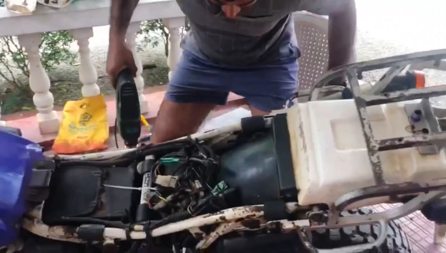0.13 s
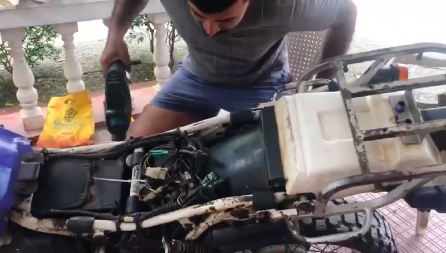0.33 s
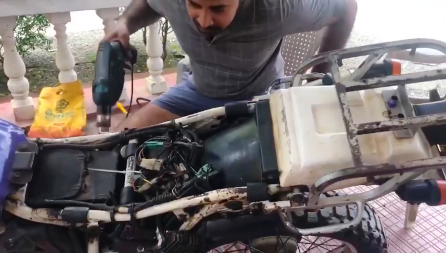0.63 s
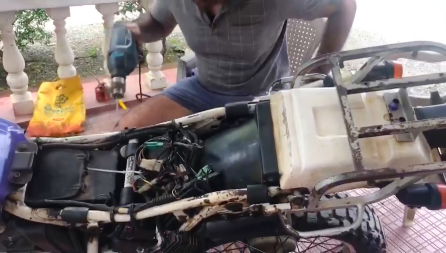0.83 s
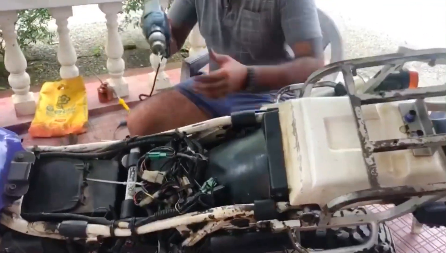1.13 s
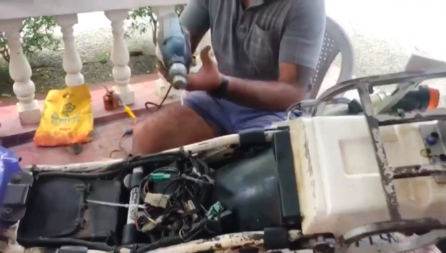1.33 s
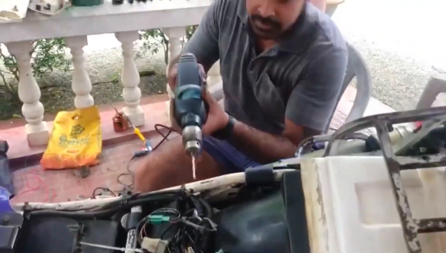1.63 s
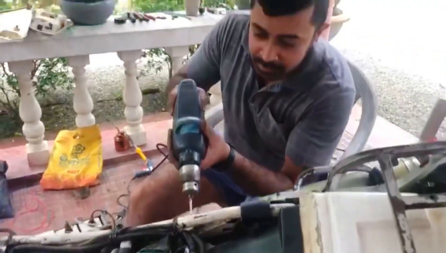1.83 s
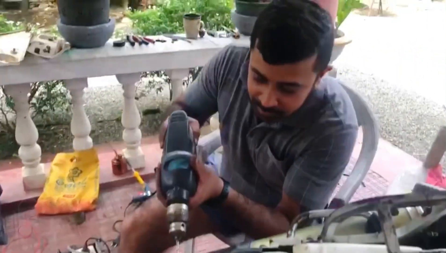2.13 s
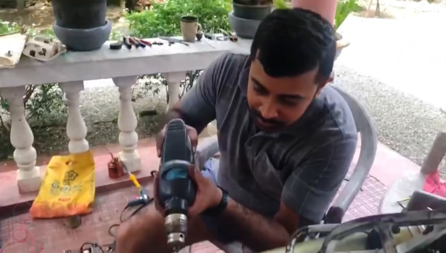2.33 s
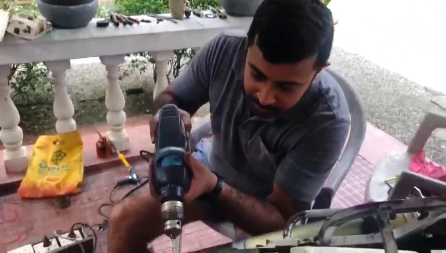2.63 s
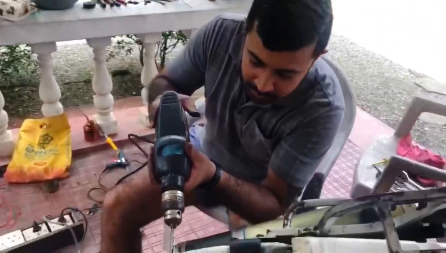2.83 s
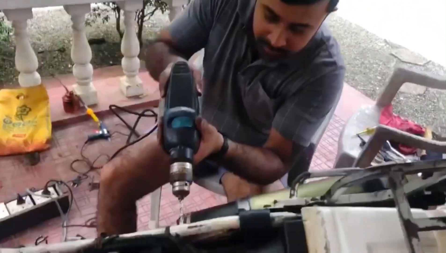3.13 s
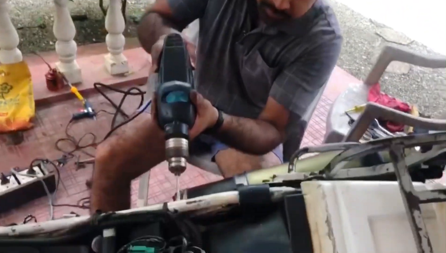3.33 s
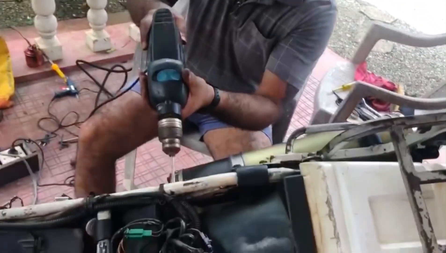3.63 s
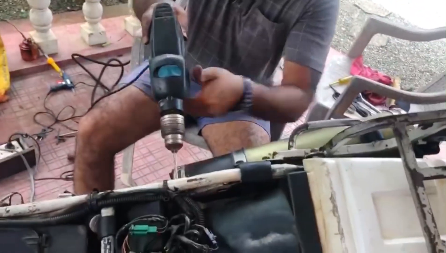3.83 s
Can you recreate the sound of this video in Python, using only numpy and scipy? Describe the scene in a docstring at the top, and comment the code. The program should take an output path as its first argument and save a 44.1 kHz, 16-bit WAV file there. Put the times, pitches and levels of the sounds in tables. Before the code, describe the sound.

An electric drill whirs down to a stop, pauses, then bursts back up to speed on a porch.

```python
"""A corded drill coasts down on a porch while a plastic chair judders over the tiles and the slowing gears
groan briefly. In the lull the tool is handled: small clicks, dull knocks, a rustle of cloth and one clink. Then
a blip of the trigger spins it up and it coasts again; garden rumble and insects lie behind throughout. The
shaft speed drives commutator whine, brush hiss and gear rattle, and in the blip the fan rush. Chair, chuck and
frame are decaying modes; knocks, cloth and garden take coloured noise."""
import sys
import numpy as np
from scipy import signal
from scipy.fft import rfft, irfft, next_fast_len
from scipy.io import wavfile
from scipy.ndimage import map_coordinates

SR = 44100
rng = np.random.default_rng(int(sys.argv[2]) if len(sys.argv) > 2 else 0)


def to_wav(s):
    """Save 16-bit WAV."""
    ch = np.atleast_2d(s).T  # columns
    pcm = np.round(np.clip(ch, -1, 1) * 32767)  # PCM
    wavfile.write(sys.argv[1], SR, pcm.astype(np.int16))


N = 176400
TOP_HZ = 12000


def amp(db):
    """Decibels to gain."""
    return 10 ** (np.asarray(db) / 20)


def unit(x):
    """Scale to rms 1."""
    return x / np.sqrt(np.mean(x ** 2) + 1e-20)


def clock():
    """Time of each sample in seconds."""
    return np.arange(N) / SR


def gains(rows):
    """One gain per sample for each dB column, -120 dB outside the rows."""
    s, *columns = np.transpose(rows)
    return [amp(np.interp(clock(), s, db, left=-120, right=-120)) for db in columns]


def wobble(knots_per_s):
    """A smooth random curve through normally distributed knots."""
    return map_coordinates(rng.standard_normal(N // 20), [clock() * knots_per_s], mode="mirror")


def filtered(x, response):
    """x times a response of frequency."""
    size = next_fast_len(N + SR // 4)
    hz = np.fft.rfftfreq(size, 1 / SR)
    return irfft(rfft(x, size) * response(hz), size)[:N]


def coloured(x, points):
    """x through a (Hz, dB) colour, falling away below the first point, at rms 1."""
    point_hz, point_db = np.transpose(points)

    def response(hz):
        db = np.interp(np.log(hz + 1), np.log(point_hz), point_db)
        return amp(db) * np.minimum(hz / point_hz[0], 1) ** 2

    return unit(filtered(x, response))


def noise(points):
    """Noise of the given colour at rms 1."""
    return coloured(rng.standard_normal(N), points)


def decay(s, t60_s):
    """A sudden start at s and an exponential fall."""
    age_s = clock() - s
    return (age_s >= 0) * amp(-60 * np.maximum(age_s, 0) / t60_s)


def ring(modes, s, scatter_db):
    """Decaying sine modes struck at s, each level scattered at random."""
    t = np.arange(SR) / SR
    tone = np.zeros(SR)
    for hz, db, t60_s in modes:
        level_db = db + scatter_db * rng.normal()
        tone += amp(level_db - 60 * t / t60_s) * np.sin(2 * np.pi * hz * t)
    attack = 1 - np.exp(-t / 0.0015)
    out = np.zeros(N + SR)
    out[max(round(s * SR), 0):][:SR] = tone * attack
    return out[:N]


SPEED_JITTER = .0012  # share of the shaft speed


def shaft(speed_hz):
    """Turns made by the slightly unsteady shaft."""
    return np.cumsum(speed_hz * (1 + SPEED_JITTER * wobble(60))) / SR


def scrape(turns, speed_hz, repeat_share):
    """Sliding contact: a roughness that repeats each turn, plus chance."""
    harmonics = int(1.3 * SR / 2 / speed_hz.max())
    phases = np.exp(2j * np.pi * rng.random(harmonics))
    track = unit(irfft(np.r_[0, phases], 2 ** 12))
    share = np.clip(repeat_share, 0, 1)
    repeated = np.interp(turns % 1 * len(track), np.arange(len(track)), track)
    return np.sqrt(share) * repeated + np.sqrt(1 - share) * rng.standard_normal(N)


# Bounces off near surfaces that make the gliding whine uneven.
# Each row: delay in seconds, gain as a signed factor.
MIRRORS = [(.0017, .16), (.0029, -.15), (.0052, .16), (.0127, .12)]


def mirrored(x):
    """Direct sound plus delayed bounces off the frame, floor and arms."""
    return filtered(x, lambda hz: 1 + sum(g * np.exp(-2j * np.pi * hz * s) for s, g in MIRRORS))


# How well the housing radiates the whine. Each row: frequency in Hz, gain in dB.
HOUSING_RESPONSE = [(400, 0), (1060, -9), (1200, 2), (1600, 2), (3000, -3), (4400, -4), (5300, 0),
                    (5680, -3), (6300, 3), (7400, -4), (8100, 3), (8800, 1), (9700, -1), (11000, -2),
                    (11800, -14)]
WHINE_FLUTTER_DB = 1.4


def whine(turns, speed_hz, orders, play):
    """Fluttering lines at multiples of shaft speed swing once a turn and swell on housing resonances."""
    out = np.zeros(N)
    for multiple, level_db in orders:
        hz = multiple * speed_hz
        housing_db = np.interp(hz, *np.transpose(HOUSING_RESPONSE))
        db = level_db + housing_db + WHINE_FLUTTER_DB * wobble(70)
        swing = 1 + play * np.cos(2 * np.pi * (turns + rng.random()))
        out += amp(db) * swing * (hz < TOP_HZ) * np.sin(2 * np.pi * multiple * turns)
    return mirrored(out)


def brushes(turns, speed_hz, colour, repeat_share, pulsing):
    """Carbon brushes hiss on the commutator, swelling once a turn."""
    pulse = 1 + pulsing * np.cos(2 * np.pi * turns)
    return coloured(scrape(turns, speed_hz, repeat_share) * pulse, colour)


def gears(turns, speed_hz, colour, repeat_share, rattle_db, sharpness, count=4):
    """Pinion teeth strike count times a turn, each strike with a random strength and a fall after it."""
    teeth = turns * count
    strength = amp(rattle_db * rng.standard_normal(N // 20))[teeth.astype(int)]
    strikes = unit(strength * np.exp(-sharpness * (teeth % 1)))
    return coloured(scrape(turns, speed_hz, repeat_share) * strikes, colour)


# Broad rings of the gearbox, swelling in turn.
# Each row: centre in Hz, width in Hz, relative level in dB, loudest moment in seconds.
GEARBOX_RINGS = [(385, 35, -17, .85), (1330, 170, -8, .86), (2290, 420, -6.5, 1.0), (3150, 400, -10, .93)]
GEARBOX_SWELL_S = 0.11


def gearbox(teeth):
    """The slack gears rouse wavering band-pass rings, each with a bell-shaped swell."""
    out = np.zeros(N)
    for hz, width_hz, db, s in GEARBOX_RINGS:
        def resonance(f):
            damping = 1j * f * width_hz
            return (damping / (hz * hz - f * f + damping)) ** 2

        tone = unit(filtered(teeth, resonance))
        swell = np.exp(-.5 * ((clock() - s) / GEARBOX_SWELL_S) ** 2)
        out += tone * amp(db + 2.2 * wobble(30.2)) * swell
    return out


# Shaft hum and whine of the 24 commutator bars and 12 rotor slots; the blip plays it too.
# Each row: multiple of shaft speed, slow level in dB and fast level in dB, both relative to the hiss gain.
WHINE_ORDERS = [(1, -25, -24), (24, -5, -4.5), (30, -17, -16), (36, -10, -12), (42, -14, -24),
                (48, -6.5, -4.5), (54, -15, -24), (60, -9.5, -28), (72, -14, -30), (84, -11.5, -30),
                (96, -9, -30)]
# Each row: time in seconds, gear rattle in dB, brush hiss and whine in dB, both before trims.
COAST_LEVEL = [(0, -39.5, -37), (.25, -42.5, -40), (.52, -47, -41.5), (.645, -40.5, -43), (.73, -44.5, -47),
               (.87, -48, -59.5), (1.02, -53.5, -71), (1.1, -57.5, -63), (1.3, -69, -68)]
# Spectra when slow. Each row: frequency in Hz, level in dB.
BRUSH_SLOW = [(1500, -21), (3500, -4.5), (4700, -5.5), (6000, -1.5), (7300, -2.5), (9500, -1), (11000, 4),
              (11700, -5), (12200, -20)]
GEARS_SLOW = [(200, -2), (385, 4), (480, -4), (800, -1.5), (1130, 0.5), (1330, 5), (1550, -3), (1900, -4),
              (2330, -4), (2750, -1.5), (3300, -1), (4500, -8.5), (8000, -18)]
COAST_HZ, FRICTION_HZ_PER_S = 124.8, 116.2
# weaker slot overtones, as multiples of shaft speed
OVERTONE_FIRST, OVERTONE_LAST, OVERTONE_STEP, OVERTONE_DB = 108, 216, 12, -12.5
PLAY_SLOW = .8  # once-a-turn swing of the whine from the rotor's play
COAST_BRUSH_DB = -3.3  # trim


def run_down():
    """Friction slows the idle rotor evenly to a 10 Hz floor; whine dies first, slack gears ring on."""
    speed_hz = np.maximum(COAST_HZ - FRICTION_HZ_PER_S * clock(), 10)
    turns = shaft(speed_hz)
    rattle, hiss = gains(COAST_LEVEL)
    singing = np.clip((speed_hz - 15) / 30, 0, 1)
    orders = [(multiple, slow_db) for multiple, slow_db, _ in WHINE_ORDERS]
    orders += [(k, OVERTONE_DB) for k in range(OVERTONE_FIRST, OVERTONE_LAST + 1, OVERTONE_STEP)]
    teeth = gears(turns, speed_hz, GEARS_SLOW, repeat_share=0.048, rattle_db=1.0, sharpness=0.44)
    brush = amp(COAST_BRUSH_DB) * brushes(turns, speed_hz, BRUSH_SLOW, repeat_share=0.17, pulsing=0.28)
    lines = singing * whine(turns, speed_hz, orders, PLAY_SLOW)
    return hiss * (brush + lines) + rattle * (amp(0.5) * teeth + gearbox(teeth))


# Trigger blip. Each row: time in seconds, shaft speed in Hz.
BLIP_SPEED = [(3.165, 15), (3.2, 140), (3.24, 214), (3.27, 258), (3.3, 290), (3.335, 308), (3.36, 303),
              (3.5, 271.4), (3.7, 233), (3.88, 200.2), (4.0, 181)]
# Each row: time in seconds, fan rush in dB, gear rattle in dB, brush hiss and whine in dB, before trims.
BLIP_LEVEL = [(3.15, -61, -64, -66), (3.156, -57, -65, -83), (3.166, -53, -47, -46), (3.18, -41, -36, -35),
              (3.208, -34.5, -34, -28), (3.242, -31, -27.5, -25.5), (3.352, -25.5, -23, -22.5),
              (3.526, -24, -27, -23), (3.77, -30, -30, -25), (3.94, -29.5, -33.5, -28.5),
              (4.0, -35, -33, -27)]
# Spectra when fast. Each row: frequency in Hz, level in dB.
BRUSH_FAST = [(1500, -25), (3500, -7), (4500, -3.5), (6000, 1.5), (7300, 2), (9000, 3), (11000, 0),
              (11700, -9), (12200, -42)]
GEARS_FAST = [(500, -8), (1200, -2.5), (1600, -1.5), (2300, -1.5), (3050, 2.5), (3800, -3), (5000, -5),
              (9000, -26)]
FAN_COLOUR = [(40, -35), (90, -39), (125, 0.5), (165, -7.5), (280, 2.5), (420, -2), (560, -3.5), (720, 4),
              (1050, 2), (1300, -6.5), (2500, -23)]
RELEASE_S, MAINS_HZ, TORQUE_RIPPLE_TURNS = 3.335, 50, .003
PLAY_FAST = .3  # once-a-turn swing of the whine
WHINE_DB, POWERED_WHINE_DB, BRUSH_DB = .6, -.5, -1.5  # trims
FAN_FLUTTER_DB = .9


def blip():
    """The motor leaps to speed, roughened by ripple at twice mains, is let go and coasts; its fan rushes."""
    speed_hz = np.interp(clock(), *np.transpose(BLIP_SPEED))
    powered = np.clip((RELEASE_S - clock()) / .03 + 1, 0, 1)  # fades over 30 ms
    ripple = TORQUE_RIPPLE_TURNS * powered * np.sin(2 * np.pi * 2 * MAINS_HZ * clock())
    turns = shaft(speed_hz) + ripple
    rush, rattle, hiss = gains(BLIP_LEVEL)
    fan = coloured(scrape(turns, speed_hz, repeat_share=0.035), FAN_COLOUR)
    fan = fan * amp(FAN_FLUTTER_DB * wobble(90))
    brush = amp(BRUSH_DB) * brushes(turns, speed_hz, BRUSH_FAST, repeat_share=0.18, pulsing=0.16)
    orders = [(multiple, fast_db) for multiple, _, fast_db in WHINE_ORDERS]
    lines = amp(WHINE_DB + POWERED_WHINE_DB * powered) * whine(turns, speed_hz, orders, PLAY_FAST)
    teeth = gears(turns, speed_hz, GEARS_FAST, repeat_share=0.14, rattle_db=1.5, sharpness=1.14)
    return hiss * (brush + lines) + amp(0.66) * rattle * teeth + amp(0.16) * rush * fan


# Modes of the plastic chair, lowest first. Each row: frequency in Hz, relative level in dB, t60 in seconds.
CHAIR_MODES = [(131.2, -2, 0.39), (200.5, 1.5, 0.28), (257.2, -3, 0.61), (310, 0.5, 0.23),
               (476, -9.5, 0.18), (727, -8, 0.18), (830, -14, 0.1), (1070, -13, 0.12), (1260, -23, .12)]
SLIP_FOCUS_DB_PER_OCTAVE, SLIP_FLOOR_DB = 18.5, -8


def slip(s, db, low_db, favoured_hz):
    """One slip rings the seat, its upper modes most of all near the pitch of its grip."""
    modes = []
    for hz, level_db, t60_s in CHAIR_MODES[1:]:
        octaves = abs(np.log2(hz / favoured_hz))
        focus_db = max(SLIP_FLOOR_DB, 3 - SLIP_FOCUS_DB_PER_OCTAVE * octaves)
        modes.append((hz, level_db + focus_db, t60_s))
    lowest = amp(low_db) * ring(CHAIR_MODES[:1], s, scatter_db=0.5)
    return amp(db) * (lowest + ring(modes, s, scatter_db=2.5))


# Slips of the chair legs. Each row: start in seconds, relative level in dB,
# extra level of the lowest mode in dB, favoured pitch in Hz.
SLIPS = [(0.001, -22, -5.5, 261), (.017, -26, -6, 196), (.055, -21, -19, 320), (.109, -21.5, -12, 288),
         (.131, -26.5, -12, 220), (.141, -24, -10, 285), (.153, -22.5, 2, 265), (.177, -25.5, -3, 241),
         (.196, -29, 6, 228), (.213, -27, 6, 225), (.306, -22, -22, 300)]
CHAIR_LOW_HZ = 118
GROAN_S, GROAN_LENGTH_S, GROAN_HZ, GROAN_SAG_HZ_PER_S = .585, 0.089, 413, 700
GROAN_DB, GROAN_OVERTONE_DB = -42, -9.5


def chair():
    """The legs stick and slip on the tiles, ringing the seat with grit noise; then the slowing gears give a
    short falling groan, a stack of sines not driven by the shaft speed."""
    judder = sum(slip(*row) for row in SLIPS)
    high_pass = signal.butter(4, CHAIR_LOW_HZ, "high", fs=SR, output="sos")
    judder = signal.sosfilt(high_pass, judder)
    grit = noise([(220, 4.0), (500, -8.5), (1200, -6), (2500, -24.0), (6000, -24.5)])
    grit = grit * sum(amp(db - 8.5) * decay(s, 0.12) for s, db, *_ in SLIPS)
    age_s = np.clip(clock() - GROAN_S, 0, GROAN_LENGTH_S)
    groan_hz = (GROAN_HZ - GROAN_SAG_HZ_PER_S * age_s) * (1 + 0.018 * wobble(150.7))
    phase = 2 * np.pi * np.cumsum(groan_hz) / SR
    harmonics = sum(amp(GROAN_OVERTONE_DB * k) * np.sin((k + 1) * phase) for k in range(3))
    groan = np.sin(np.pi * age_s / GROAN_LENGTH_S) * harmonics
    return amp(-2.0) * judder + grit + amp(GROAN_DB) * groan


# Clicks of the tool in the hand. Each row: start in seconds, level in dB, ring relative to that in dB.
CLICKS = [(1.3475, -50, -14), (1.8315, -38, -21), (2.4755, -43, -16), (2.5015, -43, -16),
          (2.6045, -36.5, 3), (2.611, -45, -10), (3.0483, -47, -24), (3.0697, -48, -17)]
# Dull knocks of the tool on the motorcycle frame. Each row: start in seconds, level in dB.
KNOCKS = [(1.838, -40), (2.475, -41), (2.5, -40.5)]
# Modes of chuck and trigger, then of the frame.
# Each row: frequency in Hz, relative level in dB, t60 in seconds.
STEEL_MODES = [(1850, -11.5, .02), (3980, 1, .02), (8950, -18, .07), (11270, -20, .06)]
FRAME_MODES = [(179, -0.5, .15), (247, -1.5, 0.28), (403, -7, 0.092)]
# Noise spectra of click, knock and cloth. Each row: frequency in Hz, level in dB.
CLICK_COLOUR = [(300, 11), (2200, 7), (5000, 3.5), (11000, -7.5)]
KNOCK_COLOUR = [(60, -5), (150, 2), (250, 1), (450, -6), (1000, -6), (2500, -18.5), (6000, -39)]
CLOTH_COLOUR = [(500, -8), (3000, 2), (6000, -5), (11000, -8.5)]
KNOCK_T60_S = .1
RUSTLE_S, RUSTLE_WIDTH_S, RUSTLE_DB = 1.945, 0.053, -56.5
CLINK_S, CLINK_HZ, CLINK_DB, CLINK_T60_S = 2.512, 3208, -47, .06


def handling():
    """Noise bursts with steel or frame modes click and knock; cloth brushes by; the bit clinks once."""
    crack = noise(CLICK_COLOUR)
    clicks = np.zeros(N)
    for s, db, ring_db in CLICKS:
        steel = amp(ring_db) * ring(STEEL_MODES, s, scatter_db=2.0)
        clicks += amp(db) * (crack * decay(s, 0.017) + steel)
    clink = ring([(CLINK_HZ, CLINK_DB, CLINK_T60_S)], CLINK_S, scatter_db=4)
    thud = noise(KNOCK_COLOUR)
    knocks = np.zeros(N)
    for s, db in KNOCKS:
        knocks += amp(db) * (thud * decay(s, KNOCK_T60_S) + ring(FRAME_MODES, s, scatter_db=0.5))
    sweep = np.exp(-((clock() - RUSTLE_S) / RUSTLE_WIDTH_S) ** 2)
    rustle = amp(RUSTLE_DB) * noise(CLOTH_COLOUR) * sweep
    return clicks + clink + knocks + rustle


PORCH_T60_S, PORCH_DB = 0.21, -11.5


def porch(x):
    """A short wash from floor, roof and wall: x convolved with decaying noise."""
    t = np.arange(SR // 3) / SR
    tail = rng.standard_normal(len(t)) * amp(-60 * t / PORCH_T60_S) * (t > .004)
    return signal.fftconvolve(x, tail / np.linalg.norm(tail))[:N]


# Outdoor rumble. Each row: frequency in Hz, level in dB.
AMBIENCE_COLOUR = [(15, -35), (25, -15.5), (74, 2.5), (98, -6.5), (141, -0.5), (269, -6), (306, -4.5),
                   (451, -8), (488, -6), (700, -12), (756, -8), (4990, -32.5), (7160, -35.5), (12000, -43)]
AMBIENCE_DB = -49
INSECT_HZ, INSECT_WIDTH_HZ, INSECT_DB = 7330, 480, -79


def garden():
    """Distant outdoor rumble and a thin band of insects, both wavering coloured noise."""
    def band(hz):
        return np.exp(-((hz - INSECT_HZ) / INSECT_WIDTH_HZ) ** 2)

    insects = unit(filtered(rng.standard_normal(N), band))
    rumble = amp(AMBIENCE_DB + 0.43 * wobble(6.95)) * noise(AMBIENCE_COLOUR)
    return rumble + amp(INSECT_DB + 1.9 * wobble(5.65)) * insects


def scene():
    """Everything on the porch, with the garden behind."""
    near = run_down() + blip() + chair() + handling()
    return (near + amp(PORCH_DB) * porch(near) + garden())[None]


def record(dry):
    """The recorder keeps nothing above its band limit."""
    return filtered(dry[0], lambda hz: hz < TOP_HZ)[None]


dry = scene()
out = record(dry)
to_wav(out)
```